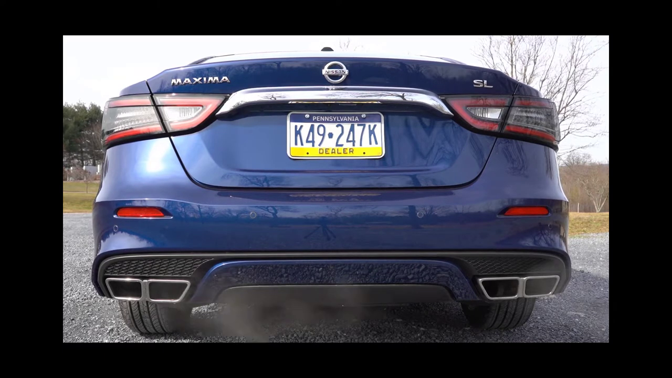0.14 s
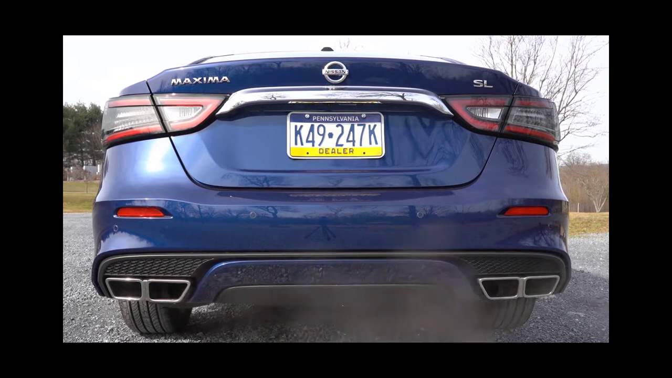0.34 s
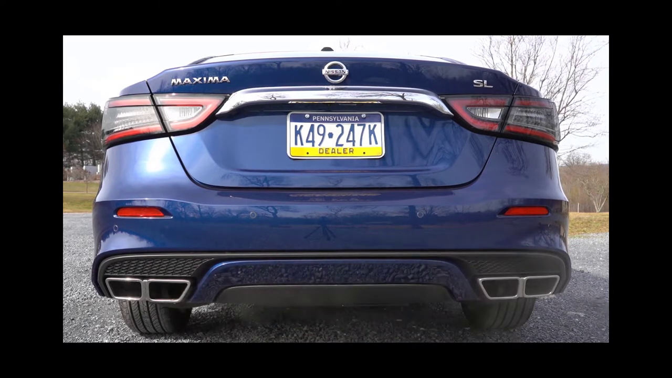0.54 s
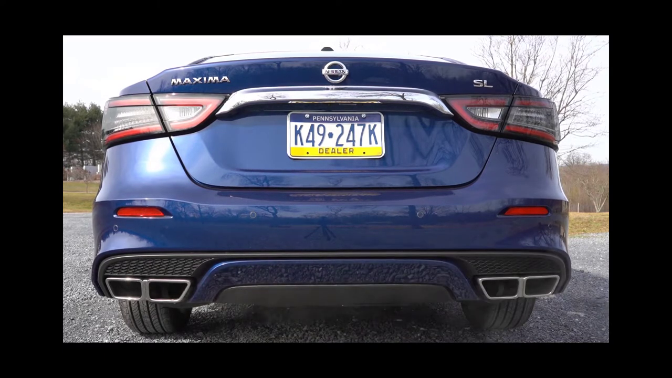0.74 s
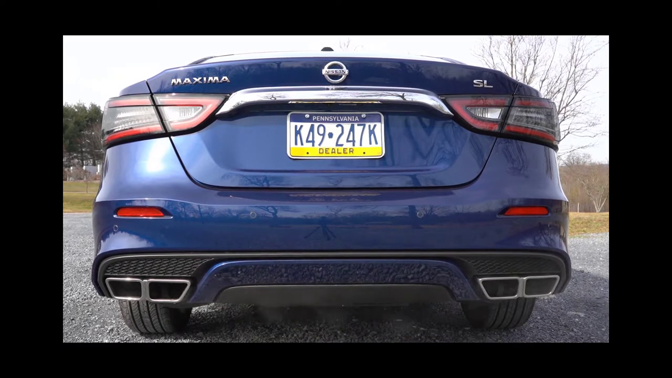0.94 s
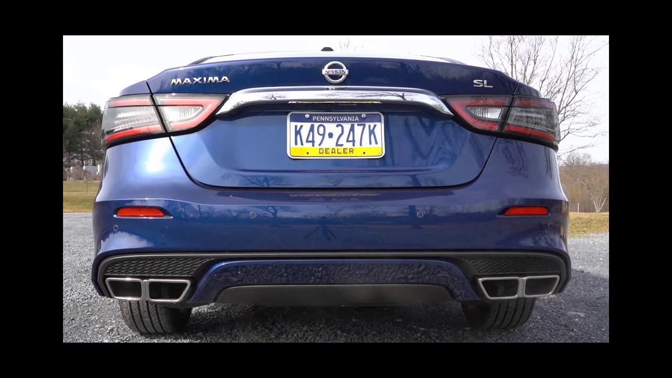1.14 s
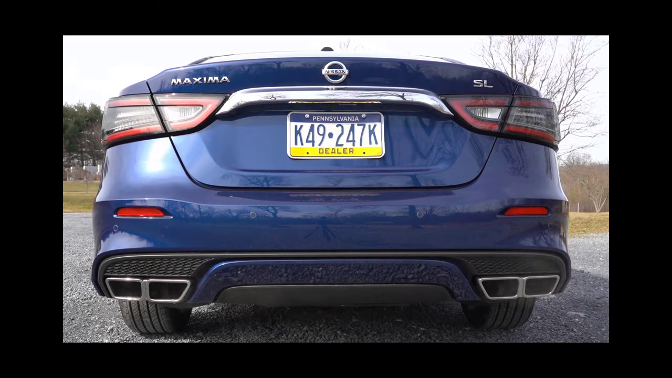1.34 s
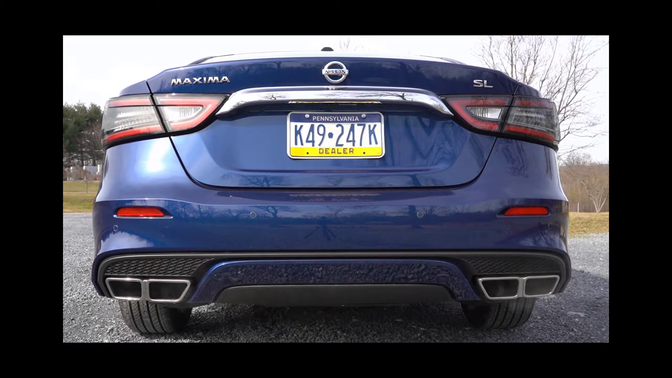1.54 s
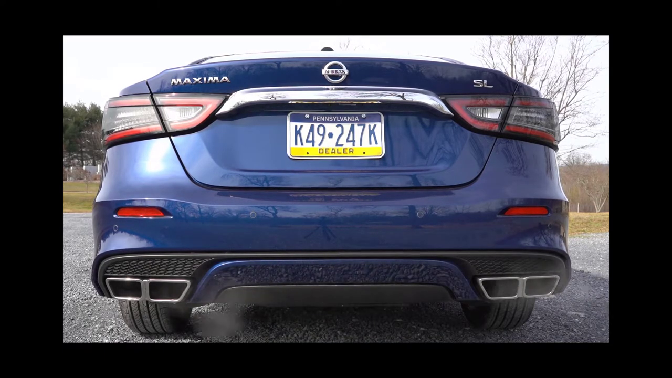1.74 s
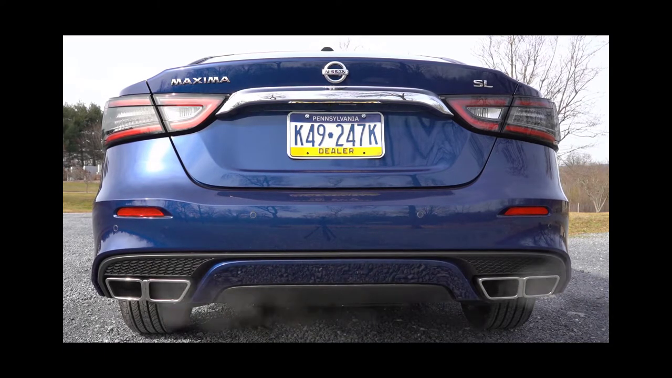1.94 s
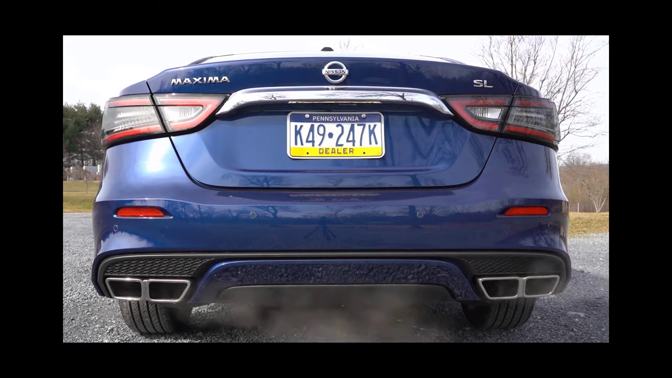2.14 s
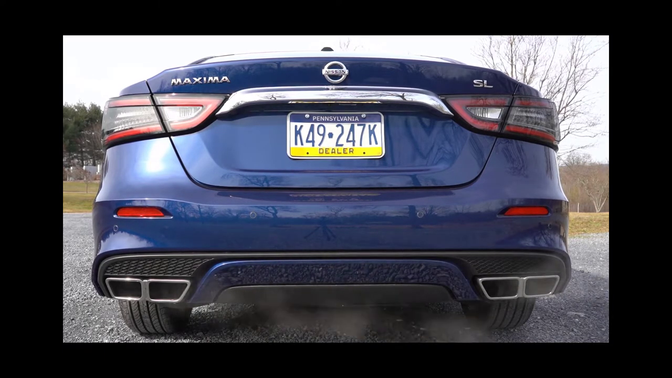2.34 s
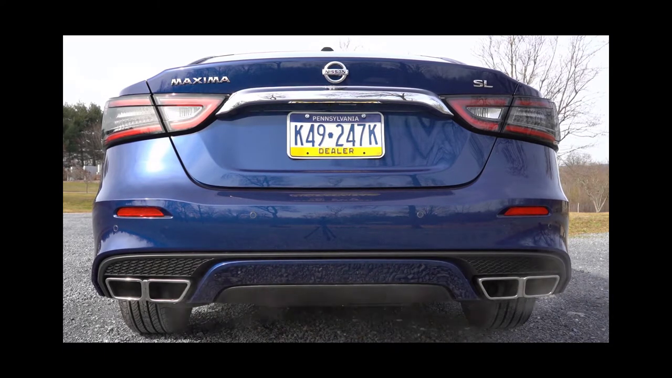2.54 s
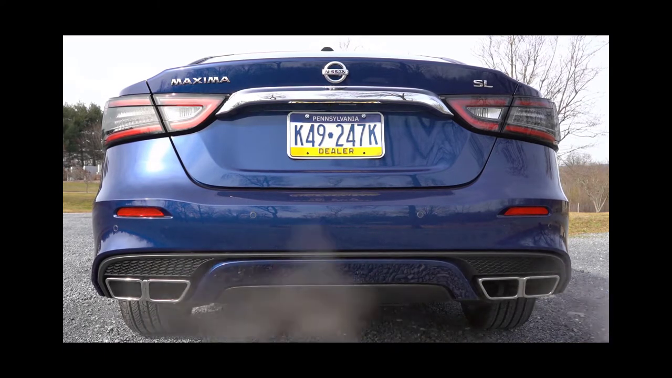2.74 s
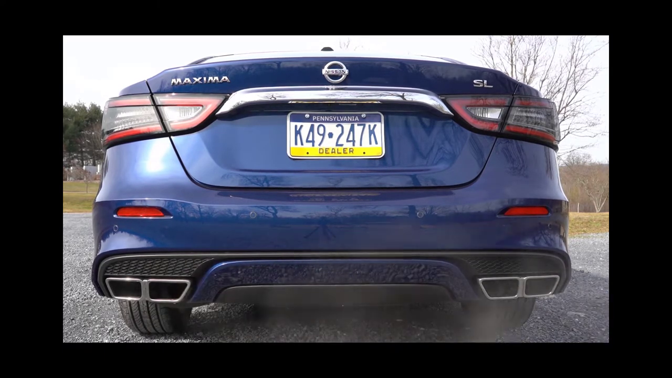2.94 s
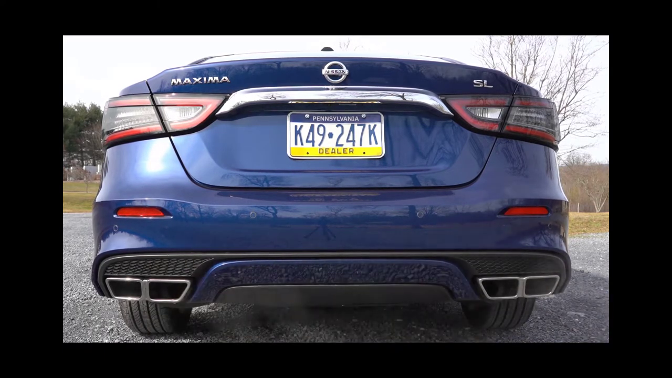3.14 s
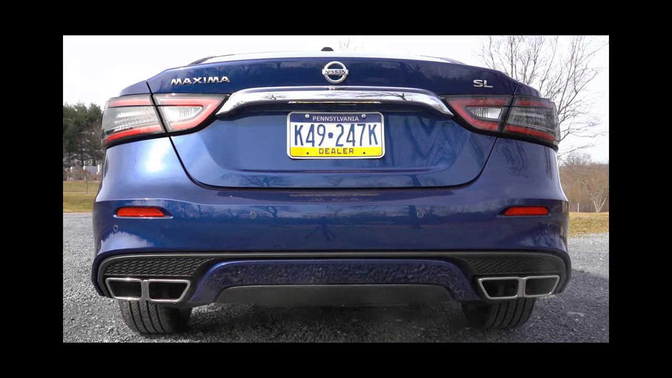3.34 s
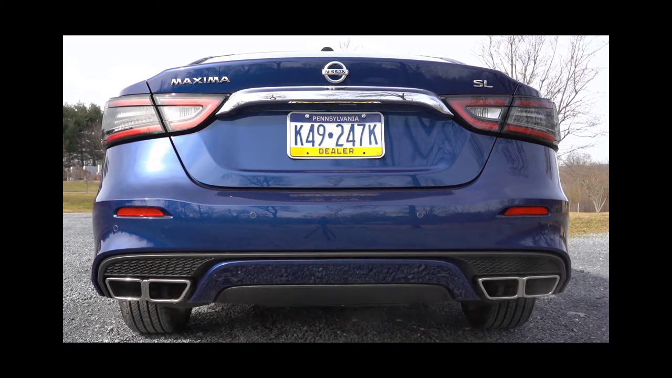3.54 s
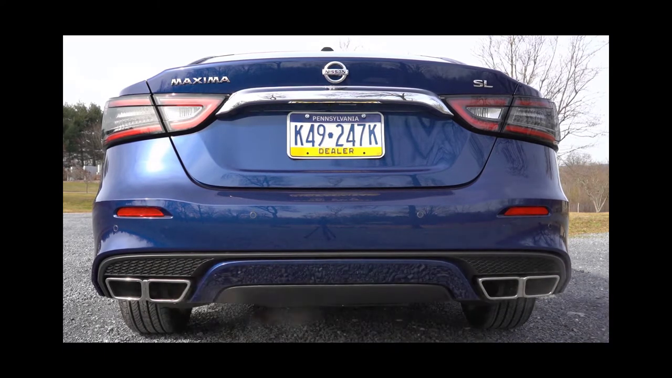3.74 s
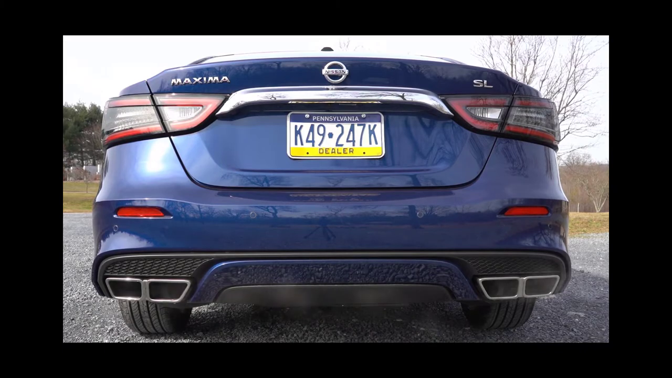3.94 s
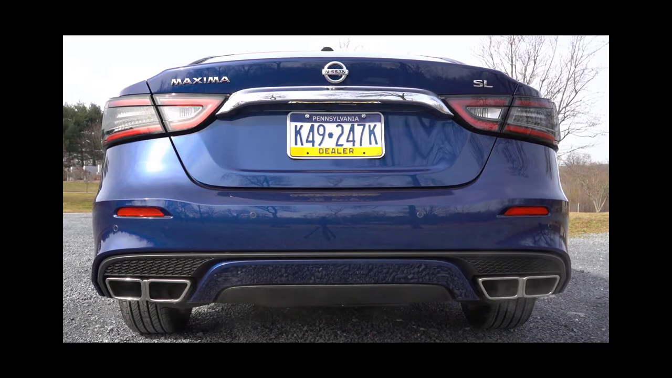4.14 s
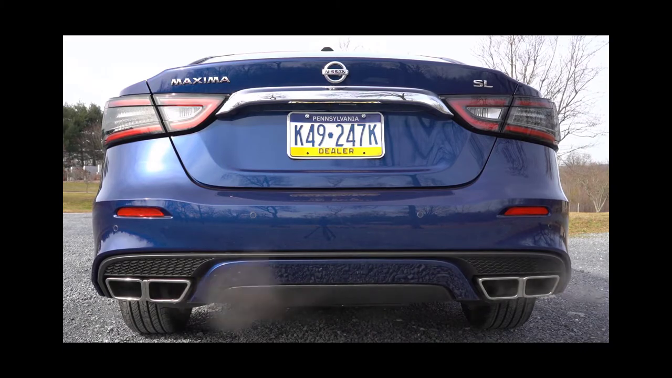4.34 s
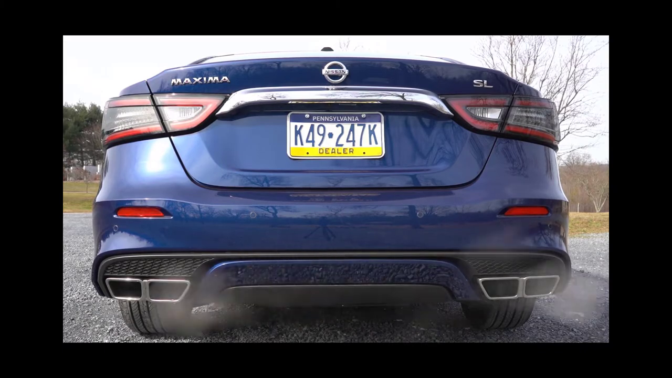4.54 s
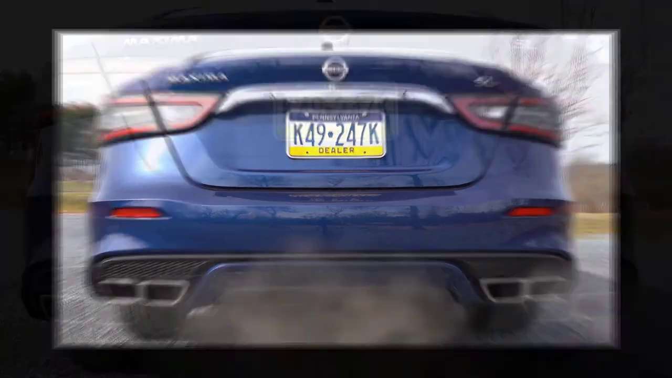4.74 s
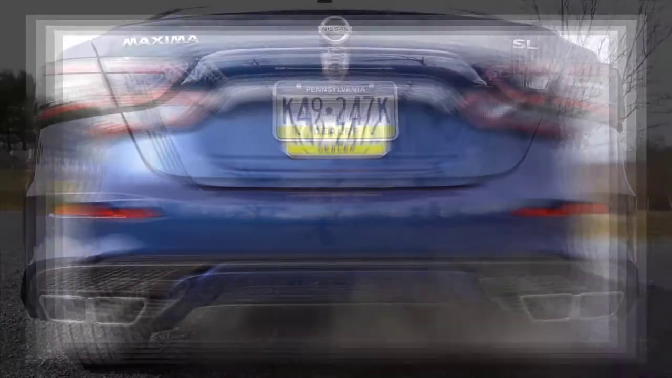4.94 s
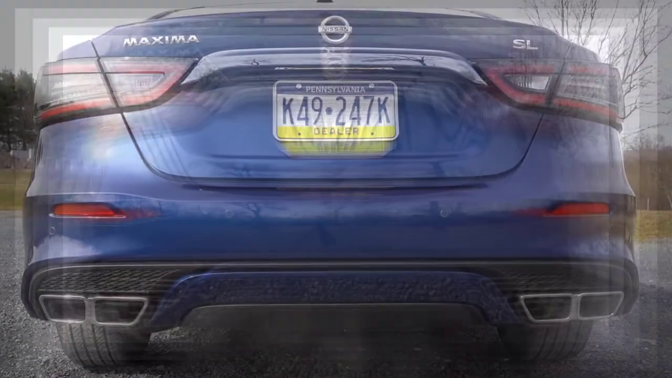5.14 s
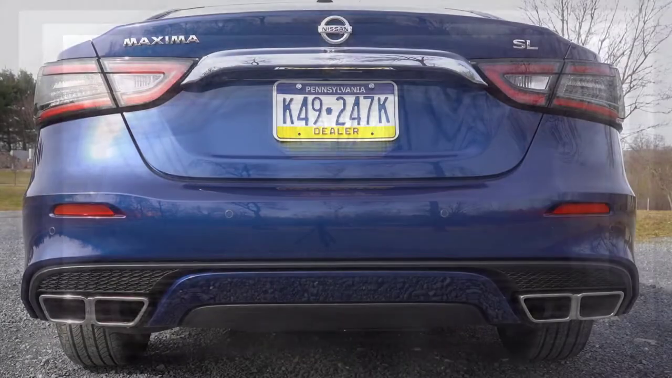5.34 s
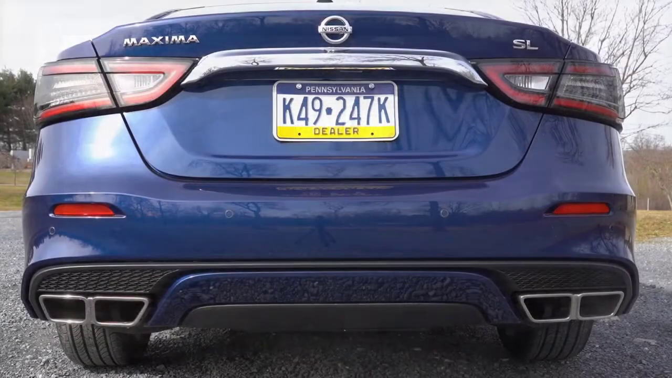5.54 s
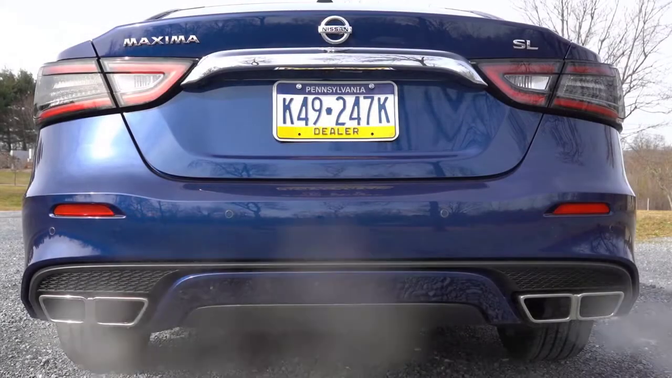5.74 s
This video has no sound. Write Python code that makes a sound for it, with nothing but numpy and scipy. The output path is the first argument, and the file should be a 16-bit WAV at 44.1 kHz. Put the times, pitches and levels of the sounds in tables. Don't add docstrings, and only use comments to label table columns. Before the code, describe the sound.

Close behind a car's tailpipes, an engine revs in repeated quick bursts, deep boom rising to rasp, ending mid-climb on a last blip.

```python
import sys
import numpy as np
from scipy import signal
from scipy.fft import rfft, irfft
from scipy.io import wavfile
from scipy.ndimage import uniform_filter1d

SR = 44100
rng = np.random.default_rng(int(sys.argv[2]) if len(sys.argv) > 2 else 0)


def wrap_up_sound(samples):
    columns = np.atleast_2d(samples).T
    tamed = np.clip(columns, -1, 1)
    steps = np.round(tamed * 32767).astype(np.int16)
    wavfile.write(sys.argv[1], SR, steps)


def gain_from_decibels(decibels):
    exponent = np.asarray(decibels, float) / 20
    return 10 ** exponent


N = 260190
T = np.arange(N) / SR
HZ = np.fft.rfftfreq(N, 1 / SR)
CYLINDERS = 6


def evened(x):
    return x / np.sqrt(np.mean(x ** 2) + 1e-20)


def curves(rows):
    s, *columns = np.transpose(rows)
    return [np.interp(T, s, column) for column in columns]


def colour(points):
    f, db = np.transpose(points)
    return gain_from_decibels(np.interp(np.log(HZ + 1), np.log(f + 1), db, left=-120, right=-120))


def filtered(x, gain):
    return irfft(rfft(x) * gain, N)


def band(x, lo_hz, hi_hz):
    low_side = 1 + (lo_hz / (HZ + 1)) ** 20
    high_side = 1 + (HZ / hi_hz) ** 20
    return evened(filtered(x, 1 / np.sqrt(low_side * high_side)))


def wander(per_s, count=1):
    knots = rng.standard_normal((count, 400))
    place = T * np.clip(per_s, 1, 60)
    k = place.astype(int)
    blend = (1 - np.cos(np.pi * (place % 1))) / 2
    return knots[:, k] * (1 - blend) + knots[:, k + 1] * blend


def engine():
    # (time [s], firing rate [Hz], firing tone rms [dB])
    blips = [
        [(0.0, 56, -25.5), (.08, 68.49, -30), (.12, 82.66, -27), (.17, 99.53, -10), (.31, 154, -13),
         (.45, 170.2, -25.5), (.62, 169.4, -45), (.88, 160.3, -26.5), (1.12, 138.7, -16)],
        [(1.28, 121.8, -15.5), (1.37, 110.7, -29.5), (1.76, 75.74, -29), (1.86, 79.63, -40), (2.0, 96.53, -22),
         (2.2, 120.2, -18), (2.48, 117.7, -23)],
        [(2.58, 115.8, -22.5), (2.62, 120.1, -7.5), (2.8, 187.5, -17.5), (2.9, 193, -17), (3.04, 198.3, -42.5),
         (3.13, 193.9, -24), (3.44, 164.3, -20.5), (3.78, 128.3, -14.5), (4.0, 103, -34)],
        [(4.12, 91.65, -25), (4.3, 76.98, -36), (4.46, 78.65, -67), (4.56, 89.85, -18), (4.69, 133.7, -7.5),
         (4.81, 150, -20), (4.9, 149.6, -52), (5.02, 153.7, -29), (5.4, 143.9, -22.5)],
        [(5.55, 127.1, -15), (5.6, 119.4, -27), (5.65, 128.6, -8.5), (5.71, 145.4, -11), (5.8, 194.1, -20.5),
         (5.9, 219.5, -30.5)],
    ]
    inertia = int(0.035 * SR)
    pull_hz_per_s, coast_hz_per_s = 138, 50
    hz, tone_db = curves(sum(blips, []))
    hz = uniform_filter1d(hz, inertia, mode="nearest")
    slope = uniform_filter1d(np.gradient(hz) * SR, inertia, mode="nearest")
    pull = np.clip(slope / pull_hz_per_s, 0, 1)
    coast = np.clip(-slope / coast_hz_per_s, 0, 1)
    return hz, tone_db, pull, coast


def follow(cruise_db, share, octave_db, overrun_db, flare_db, gust_db=0.9, lag_s=0.0, steep=0.49, tips=0):
    # (time [s], level [dB])
    gas_flow = [(0.0, -43.5), (0.36, -24), (0.77, -28.5), (0.92, -28.5), (1.77, -41.5), (2.1, -28.5),
                (2.4, -31.5), (2.7, -33), (2.81, -24), (3.53, -28), (3.71, -34.5), (4.44, -43.5),
                (4.58, -30.5), (4.96, -28), (5.19, -33.5), (5.47, -31.5), (5.52, -37.5), (5.9, -22.5)]
    # (peak [s], rise [s], fall [s], level [dB])
    overruns = [
        (1.2, 0.17, 0.27, -3),
        (3.72, .25, 0.28, -4),
        (5.54, 0.092, 0.12, -4),
    ]
    # (middle [s], half width [s], level [dB], extra ring of the tips [dB])
    flares = [(0.061, 0.028, -15.5, -1), (0.198, 0.078, 1.5, -13), (0.332, 0.056, 0, -4),
              (2.069, 0.081, -8, -12), (2.581, 0.17, -13, -11.5), (2.758, 0.06, 2, 4),
              (2.899, 0.094, -9, 4), (4.622, 0.049, -1.5, -6.5), (4.76, 0.077, -10.5, -5),
              (5.652, .015, -2, -15), (5.742, 0.047, 4, 6), (5.838, 0.045, 4, 14)]
    cruise_hz, cruise_flow_db = 150, -27.5
    tail_shape = 2.1
    t = T - lag_s
    ring, flare = np.zeros(N), np.zeros(N)
    for s, rise, fall, db in overruns:
        before = t < s
        away = abs((t - s) / np.where(before, rise, fall))
        ring += gain_from_decibels(db) * np.exp(-away ** np.where(before, 2, tail_shape))
    for s, half, db, tips_db in flares:
        flare += gain_from_decibels(db + tips * tips_db) * np.exp(-((t - s) / half) ** 2)
    flow_db = share * (curves(gas_flow)[0] - cruise_flow_db)
    speed_db = octave_db * np.log2(engine()[0] / cruise_hz)
    steady = gain_from_decibels(cruise_db + flow_db + speed_db)
    power = steady ** 2 + (gain_from_decibels(overrun_db) * ring ** steep) ** 2 + (gain_from_decibels(flare_db) * flare ** steep) ** 2
    return 10 * np.log10(power) + gust_db * wander(12)[0]


def boom():
    # (multiple, level [dB], added under pull [dB], added when coasting [dB], share of the firing tone's swing)
    orders = [
        (.5, -28, -6.5, 3.5, 0.1),
        (1.5, -27, 2.5, 1.5, 0.35),
        (2, -31, 15.5, 3, 0.12),
        (3, -40.5, 17, -6.5, -0.47),
    ]
    # (frequency [Hz], width [Hz], level [dB])
    boom_modes = [(140, 21, 6.5), (179.3, 35.3, -4), (286, 38.4, -4.5), (384, 8, -6.5)]
    # (frequency [Hz], width [Hz], level [dB])
    bank_modes = [(56, 30, -2.5), (94.6, 8.5, 2), (133.9, 18.6, 2.5), (283.7, 53, -2)]
    hz, tone_db, pull, coast = engine()
    turns = np.cumsum(hz) / SR
    waver = wander(22, count=10)
    out = gain_from_decibels(tone_db + 0.97 * waver[0]) * np.cos(2 * np.pi * turns + 0.051 * waver[5])
    for k, (multiple, db, pull_db, coast_db, share) in enumerate(orders):
        order = round(2 * multiple) / 2
        notes = bank_modes if order % 1 else boom_modes
        pipe_power = sum(gain_from_decibels(g_db) ** 2 / (1 + (2 * (order * hz - f) / w) ** 4) for f, w, g_db in notes)
        order_db = db + pull_db * pull + coast_db * coast + share * (tone_db + 24) + 2 * waver[k + 1]
        phase = 2 * np.pi * order * turns + 0.087 * order * waver[k + 6] + k
        out += gain_from_decibels(order_db) * np.sqrt(pipe_power) * np.cos(phase)
    return np.sqrt(2) * out


def gas_pulses(half_db=2, fade_db=-0.07):
    hz = engine()[0]
    uneven_firing = 0.016 * wander(45)[0]
    cycle = 2 * np.pi * np.cumsum(hz) / SR / CYLINDERS + uneven_firing
    size = gain_from_decibels(4.5 * np.clip(rng.standard_normal((70, 26)), -2, 1.6))
    phase = 2 * np.pi * rng.random((70, 1)) + 0.3 * rng.standard_normal((70, 26))
    knots = np.linspace(0, N / SR, 26)
    out = np.zeros(N)
    for k in range(1, 70):
        if k % 3 or k > 12:
            db = half_db * (k % 3 == 0) + fade_db * max(k - 36, 0)
            swell = gain_from_decibels(db) * np.interp(T, knots, size[k])
            out += swell * np.cos(k * cycle + np.interp(T, knots, phase[k]))
    return evened(out) * np.sqrt(hz / 150)


def turbulence(chuff=0.12, gust_db=-0.15):
    turns = np.cumsum(engine()[0]) / SR
    puff = 1 + chuff * np.cos(2 * np.pi * turns) + 0.11 * np.cos(2 * np.pi * turns / CYLINDERS)
    gusts = gain_from_decibels(gust_db * wander(30)[0] + 0.43 * wander(3.4)[0])
    return evened(rng.standard_normal(N) * puff * gusts)


def pipe_response():
    # (frequency [Hz], width [Hz], level [dB])
    pipe_modes = [(52, 71, -5), (103, 47, 3), (133.4, 41.7, 2.5), (180.3, 50, -6), (277.1, 14.6, -1.5),
                  (382.7, 7, 6.5), (422.5, 10.6, -6), (492.6, 22.2, -7.5), (548.2, 15.5, -1.5),
                  (636.4, 24, -2), (765, 21.8, -3), (857, 11.4, -3.5), (930.2, 17.5, -3), (992.5, 17, -3),
                  (1251, 11, -11), (1417, 34, -11.5), (1500, 21, -5), (1603, 17, -11), (2100, 110, -46),
                  (2147, 22, -15.5), (2356, 55, -22), (2723, 19, -20.5), (3255, 130, -35),
                  (3677, 100, -35.5), (4020, 130, -29.5), (4480, 630, -31.5), (4660, 71, -41.5)]
    # (frequency [Hz], level [dB])
    between = [(20, -35), (100, -16), (300, -23), (1000, -27.5), (1150, -22), (2000, -23.5), (3000, -36),
               (5000, -38), (5800, -49.5)]
    modes = sum((-1) ** k * gain_from_decibels(db) / (1 + 2j * (HZ - f) / w) for k, (f, w, db) in enumerate(pipe_modes))
    return np.sqrt(abs(modes) ** 2 + colour(between) ** 2) * np.exp(1j * np.angle(modes))


def low_rumble(blown, rung, roar_db):
    pull = uniform_filter1d(engine()[2], int(0.15 * SR))
    rumble_db = -28 + 0.27 * (roar_db + 28) - 5 * pull
    mixed = blown + gain_from_decibels(-9.5) * (rung - blown)
    return gain_from_decibels(rumble_db + 2.1 * wander(9)[0]) * band(mixed, 31, 185)


def silencer_hum(rung):
    # (cruise level [dB], share of gas flow, rise per octave of speed [dB], overrun ring [dB], flare [dB])
    hum = (-35, 1.5, -7.3, -31.5, -44)
    # (middle [s], half width [s], level [dB])
    hum_swells = [(.37, 0.039, -16.5), (.5, 0.047, -19.5), (.78, 0.077, -27.5), (.92, 0.036, -25),
                  (1.129, 0.078, -23.5), (2.0, 0.027, -35), (2.25, 0.091, -29.5), (2.601, 0.032, -24),
                  (2.84, .04, -20.5), (3.13, 0.089, -25), (3.29, .07, -20), (3.552, 0.13, -23.5),
                  (5.25, 0.025, -32)]
    swells = sum(gain_from_decibels(db) * np.exp(-((T - s) / half) ** 2) for s, half, db in hum_swells)
    return np.hypot(gain_from_decibels(follow(*hum, gust_db=0.0)), swells) * band(rung, 356, 458)


def outlet_spray(flow):
    # (frequency [Hz], level [dB per Hz])
    jet = [(5000, -7.5), (5700, -9.5), (6800, -12), (7300, -16.5), (9500, -19.5), (11000, -26.5),
           (14000, -30.5), (16000, -32.5)]
    # (cruise level [dB], share of gas flow, rise per octave of speed [dB], overrun ring [dB], flare [dB])
    spray = (-63, 0.53, 7, -51, -54.5)
    return gain_from_decibels(follow(*spray, steep=1.6)) * band(filtered(flow, colour(jet)), 4850, 17000)


def tailpipes():
    # (cruise level [dB], share of gas flow, rise per octave of speed [dB], overrun ring [dB], flare [dB])
    drone = (-34.5, 0.4, -5.1, -39, -32)
    roar = (-27.5, 1.13, 4.2, -48, -31)
    outlet_tips = (-34, 1.22, 6, -39, -26.5)
    rasp = (-43, 0.37, 0.5, -33, -30)
    fizz = (-49.5, -0.31, 11, -33.5, -38.5)
    hiss = (-50.5, 0.36, 5, -40, -38)
    through = pipe_response()
    flow = turbulence()
    blown = filtered(flow, through)
    rung = blown + gain_from_decibels(-5) * filtered(gas_pulses(), through)
    roar_db = follow(*roar)
    out = low_rumble(blown, rung, roar_db)
    out += gain_from_decibels(follow(*drone, gust_db=1.5)) * band(rung, 190, 324.5)
    out += silencer_hum(rung)
    out += gain_from_decibels(roar_db) * band(rung, 490, 790)
    out += gain_from_decibels(follow(*outlet_tips, gust_db=2.0, lag_s=0.02, tips=1)) * band(rung, 1000, 1057)
    out += gain_from_decibels(follow(*rasp, steep=1.0)) * band(rung, 1212, 1790)
    out += gain_from_decibels(follow(*fizz, steep=0.82)) * band(rung, 1800, 3170)
    out += gain_from_decibels(follow(*hiss, steep=1.14)) * band(blown, 2680, 5600)
    return out + outlet_spray(flow)


def open_air():
    # (frequency [Hz], level [dB per Hz])
    air = [(150, 19.5), (1000, 25.5), (3000, 2.5), (5000, -14.5), (6000, -8.5), (8000, -11.5), (11000, -10),
           (14000, -13.5), (16000, -19.5)]
    return gain_from_decibels(-43.5) * band(filtered(rng.standard_normal(N), colour(air)), 150, 17000)


def electric_whine():
    # (time [s], level [dB])
    whine = [(0, -86), (.3, -88), (1.3, -87), (1.5, -77), (2.62, -77), (2.7, -90), (5.9, -92)]
    hz = 9152 + 6 * wander(3)[0]
    return np.sqrt(2) * gain_from_decibels(curves(whine)[0]) * np.cos(2 * np.pi * np.cumsum(hz) / SR)


def pops(note_hz=125, t60_s=0.3):
    # (time [s], level [dB])
    burns = [
        (.07, -17),
        (2.999, -23.5),
        (3.229, -15),
        (3.298, -15),
        (3.361, -12),
        (3.4, -14),
    ]
    t = np.arange(SR // 4) / SR
    attack = np.minimum(t / 0.017, 1)
    thud = attack * gain_from_decibels(-60 * t / t60_s) * np.sin(2 * np.pi * note_hz * t)
    out = np.zeros(N + SR)
    for s, db in burns:
        out[round(s * SR):][:len(t)] += gain_from_decibels(db) * thud
    return out[:N]


def metal_ticks():
    # (time [s], peak level [dB])
    ticks = [
        (0.0772, -55),
        (4.597, -65),
        (5.1788, -44),
        (5.6461, -49),
    ]
    strikes = np.zeros(N)
    for s, db in ticks:
        strikes[round(s * SR)] = gain_from_decibels(db + 11)
    click = signal.butter(2, 6500, "highpass", fs=SR)
    return signal.lfilter(*click, strikes)


def scene():
    exhaust = boom() + tailpipes() + pops()
    surroundings = open_air() + electric_whine() + metal_ticks()
    return (exhaust + surroundings)[None]


def roll_off(x):
    return signal.sosfilt(signal.butter(12, 15655, fs=SR, output="sos"), x)


def record(dry):
    mix = 0.95 * np.tanh(dry / 0.95)
    return roll_off(mix)


dry = scene()
out = record(dry)
wrap_up_sound(out)
```